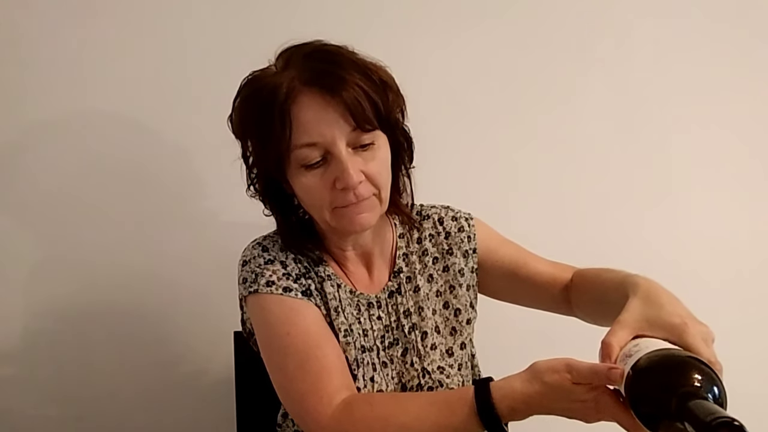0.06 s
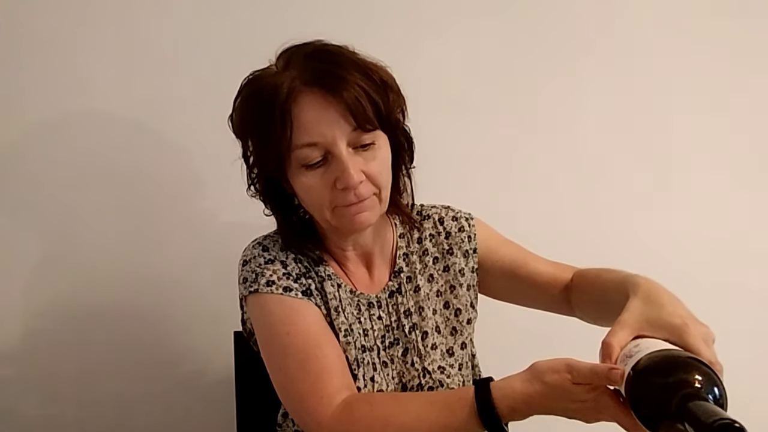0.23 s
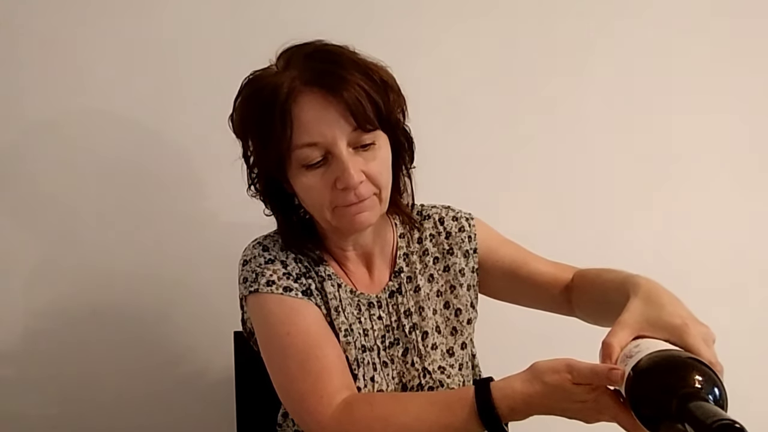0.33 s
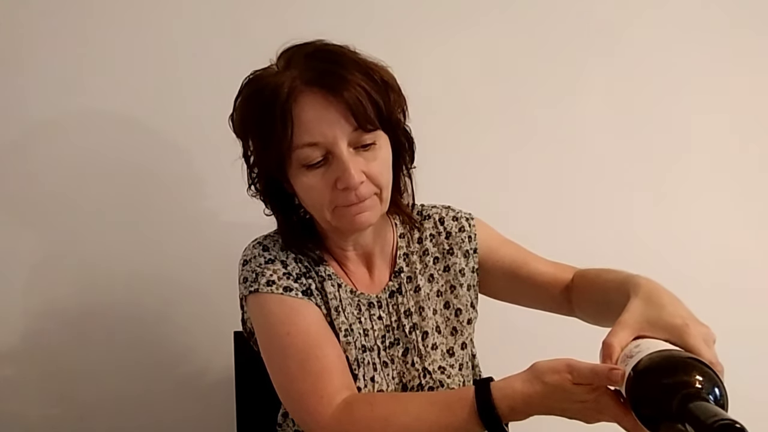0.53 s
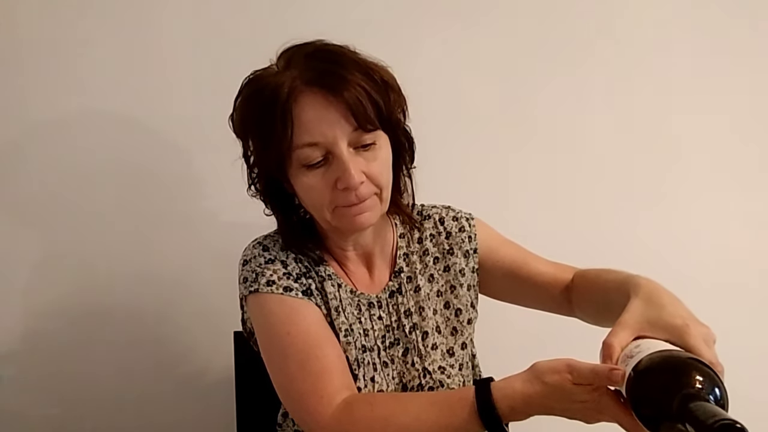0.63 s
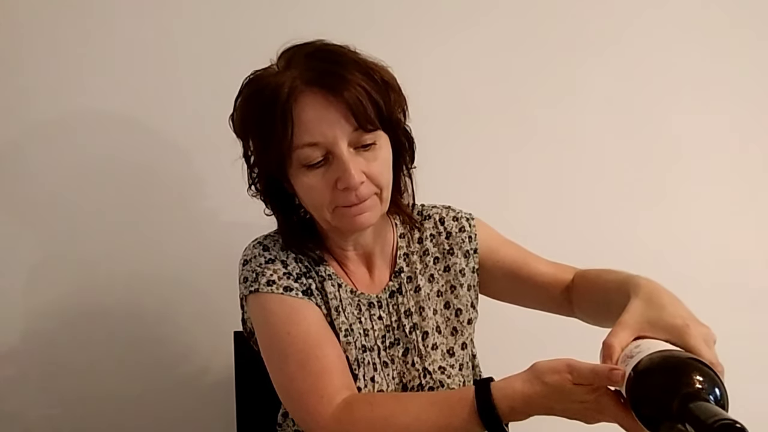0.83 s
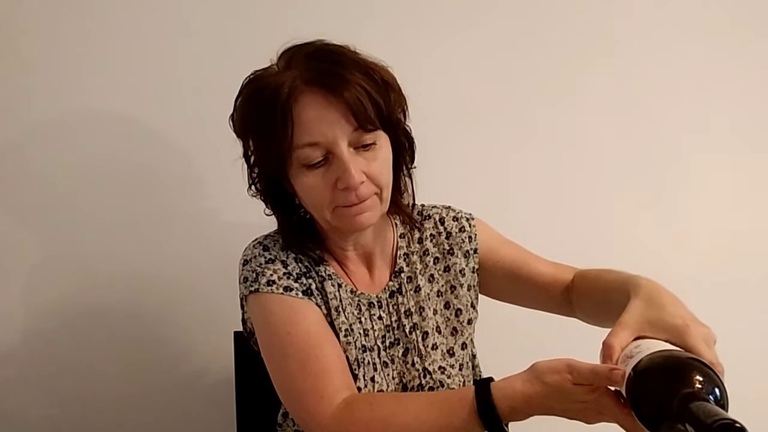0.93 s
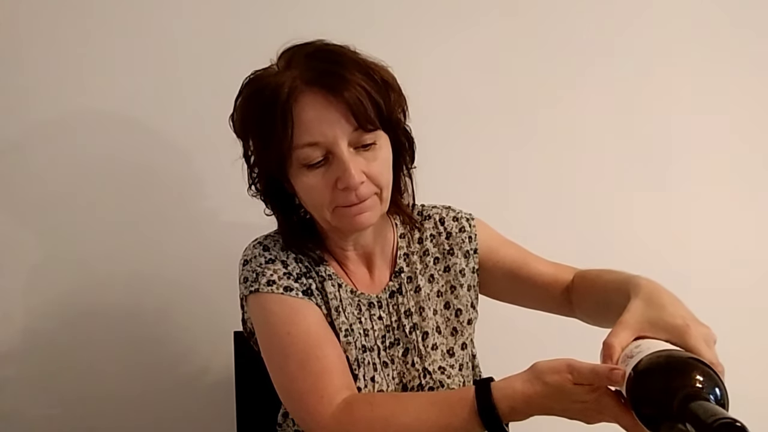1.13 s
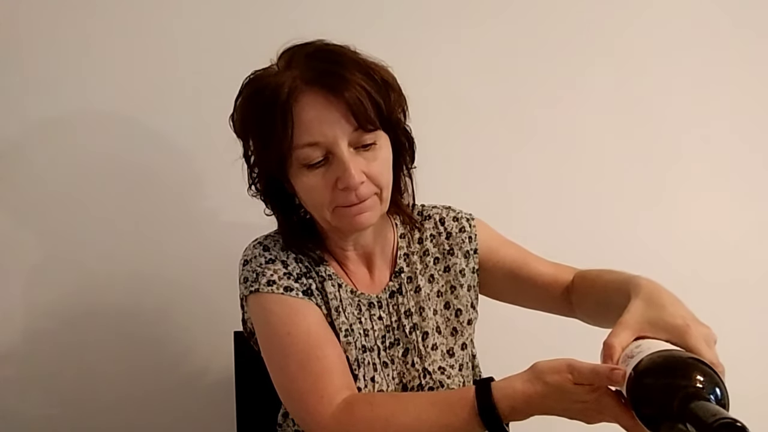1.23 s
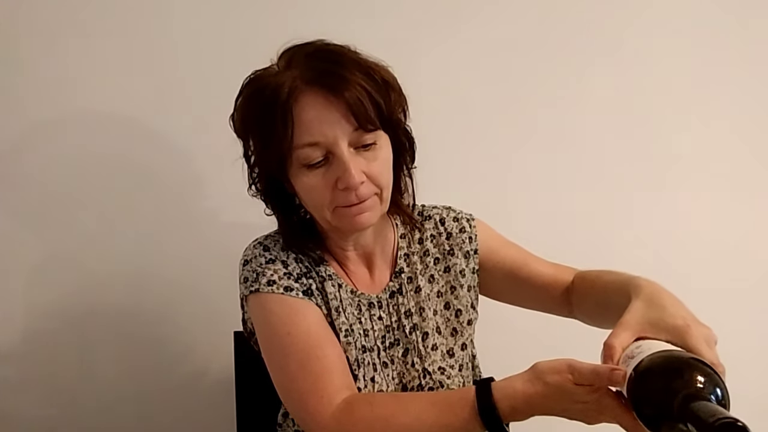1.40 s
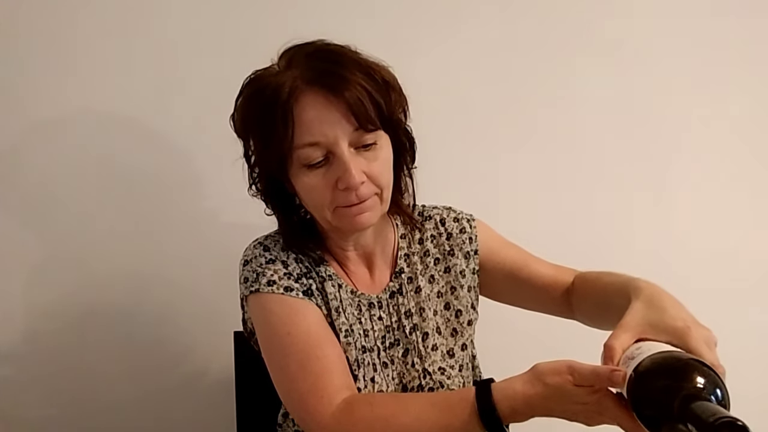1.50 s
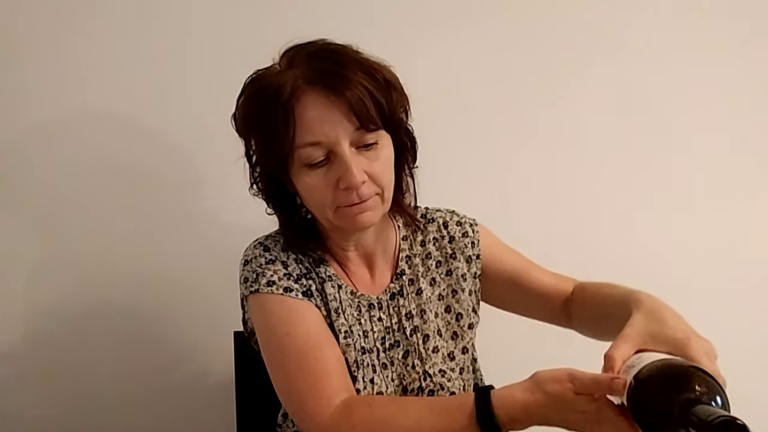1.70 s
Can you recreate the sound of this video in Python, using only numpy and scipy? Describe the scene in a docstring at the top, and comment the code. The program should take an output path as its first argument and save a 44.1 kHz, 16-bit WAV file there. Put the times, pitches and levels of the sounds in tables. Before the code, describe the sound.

Irregular bubbly glugs of water pouring from bottle to jug, with fine spray fizz and low air gulps; scattered at first, then a strong run, a lull and another burst, heard with short echoes off near walls.

```python
"""Water glugs from a tilted glass bottle into a jug in a small bare room.
It opens on faint narrow rings, a breath of spray fizz and a low gulp of air; then the first slugs froth and pop.
Scattered glugs lead to the loudest run, from about 0.8 s to 1.1 s, with low gulps in the bottle beneath.
After a lull a steady tone grows at 1.29 s into a second strong burst near 1.42 s, then thin glugs to the end.
Bubbles are short rings of rising pitch, coloured by jug resonances; echoes off near walls repeat them."""
import sys
import numpy as np
from scipy import signal
from scipy.fft import rfft, irfft
from scipy.io import wavfile

SR = 44100
rng = np.random.default_rng(int(sys.argv[2]) if len(sys.argv) > 2 else 0)


def generate_wav(sig):
    """Save sig (samples, or channels by samples) to the path in sys.argv[1] as 16-bit PCM at SR."""
    pcm = np.round(np.clip(np.atleast_2d(sig).T, -1, 1) * 32767).astype(np.int16)
    wavfile.write(sys.argv[1], SR, pcm)


def invert_db(level):
    """Linear amplitude ratio for a level in decibels (20 dB per decade), elementwise."""
    return 10 ** (np.asarray(level, dtype=float) / 20)


N = 77175  # samples, 1.75 s


def bubbles(time_s, level_db, pitch_hz, t60_s, climb, swell_s):
    """A trapped bubble swells, then dies away while its pitch climbs by twice the share `climb` over t60."""
    t60_s = np.maximum(t60_s, 0.002)
    t = np.arange(int(min(t60_s.max(), 0.07) * SR)) / SR
    pitch_hz, t60_s = np.asarray(pitch_hz)[:, None], t60_s[:, None]
    progress = np.minimum(t / t60_s, 1)
    phase = 2 * np.pi * pitch_hz * t * (1 - climb / 2 + climb * progress)
    shape = (1 - np.exp(-(t / swell_s) ** 2)) * invert_db(-60 * t / t60_s)
    shape = shape / shape.max(axis=1, keepdims=True)
    rings = invert_db(level_db)[:, None] * shape * np.sin(phase)
    # each ring starts one swell early, so that it is full near its stated time
    start = np.maximum((time_s - swell_s) * SR, 0).astype(int)
    at = start[:, None] + np.arange(len(t))
    return np.bincount(at.ravel(), rings.ravel(), N + SR)[:N]


# large bubbles, peak level ahead of jug and room: time_s, level_db, pitch_hz, t60_s
LARGE_BUBBLES = [(0.21, -41.5, 770, 0.026), (0.265, -40, 940, 0.018), (0.29, -43.5, 858, 0.072),
                 (0.46, -47, 924, 0.026), (0.481, -45, 990, 0.031), (0.509, -44.5, 910, 0.062),
                 (0.153, -63, 796, 0.021), (0.397, -64.5, 522, 0.018), (0.590, -43, 1073, 0.03),
                 (0.606, -46, 948, 0.04), (0.657, -43.5, 788, 0.012), (0.733, -39.5, 770, 0.026),
                 (0.78, -44.5, 989, 0.02), (0.809, -31.5, 892.5, 0.065), (0.843, -43.5, 924, 0.088),
                 (0.954, -48, 866, 0.041), (1.0, -31, 858, 0.037), (1.033, -33, 974, 0.0305),
                 (1.047, -40, 963, 0.044), (1.106, -44, 979, 0.029), (1.357, -40.5, 839, 0.022),
                 (1.415, -33, 794, 0.052), (1.445, -36.5, 816, 0.032), (1.603, -57, 1020, 0.068),
                 (1.668, -44.5, 780, 0.0064)]


def glugs():
    """Large bubbles swell slowly, ring low and climb the most in pitch."""
    time_s, level_db, pitch_hz, t60_s = np.transpose(LARGE_BUBBLES)
    return bubbles(time_s, level_db, pitch_hz, t60_s, climb=0.22, swell_s=0.003)


# small bubbles, peak level ahead of jug and room: time_s, level_db, pitch_hz
SMALL_BUBBLES = [(0.1517, -59.5, 4150), (0.2672, -43.5, 2930), (0.3121, -55, 2340), (0.335, -44, 2570),
                 (0.5071, -46, 2156), (0.7795, -50.5, 2094), (0.9621, -45, 2763), (0.974, -42.5, 3840),
                 (0.997, -39, 2184), (1.4168, -33.5, 2228), (1.4162, -41.5, 2920), (1.468, -47.5, 2866),
                 (1.4949, -47, 2520)]


def plinks():
    """Small bubbles ring higher, each for the same count of cycles."""
    time_s, level_db, pitch_hz = np.transpose(SMALL_BUBBLES)
    return bubbles(time_s, level_db, pitch_hz, 48 / pitch_hz, climb=0.1, swell_s=0.001167)


# droplets of spray, peak level ahead of jug and room: time_s, level_db, pitch_hz
SPRAY_DROPLETS = [(0.4682, -47, 6460), (0.5187, -44.5, 6630), (0.5275, -44.5, 7740), (0.6153, -50, 5520),
                  (0.8534, -47.5, 8300), (0.89, -49, 7500), (0.958, -42, 5650), (0.9955, -40.5, 6060),
                  (1.066, -48, 5820), (1.0983, -48.5, 6300), (1.2828, -49, 7350), (1.511, -49, 7000),
                  (1.5657, -45, 5780), (1.6823, -44, 5720)]


def droplets():
    """Droplets of spray tick as very short, high rings with little climb."""
    time_s, level_db, pitch_hz = np.transpose(SPRAY_DROPLETS)
    return bubbles(time_s, level_db, pitch_hz, 55 / pitch_hz, climb=0.04, swell_s=0.0006)


# water slaps the surface, click level ahead of jug and room: time_s, level_db
SURFACE_SLAPS = [(0.2668, -32), (.336, -39), (0.5785, -33.5), (1.4165, -32.5), (1.682, -47)]


def slaps():
    """Water slaps the surface: clicks dulled by a band-pass."""
    low_hz, high_hz = 350, 1670
    time_s, level_db = np.transpose(SURFACE_SLAPS)
    clicks = np.bincount((time_s * SR).astype(int), invert_db(level_db), N) + 1e-18
    band = signal.butter(3, [low_hz, high_hz], "band", fs=SR, output="sos")
    return signal.sosfilt(band, clicks) * SR / high_hz / 2  # makes up for the narrow band


def rms_one(x):
    """Scales a signal to rms 1."""
    return x / np.sqrt(np.mean(x ** 2) + 1e-20)


def swarm(count, low_hz, high_hz, cycles, climb):
    """Many bubbles at random moments, levels and pitches; rms 1."""
    when, chance, place = rng.random((count, 3)).T
    pitch_hz = low_hz * (high_hz / low_hz) ** place
    level_db = -3.5 * np.log(chance * 0.98 + 0.02)  # a few stand well above the rest
    swell_s = 3.564 / pitch_hz.mean()
    return rms_one(bubbles(when * N / SR, level_db, pitch_hz, cycles / pitch_hz, climb, swell_s))


def bursts(start_s, length_s, level_db, rise_s, fade_s):
    """One envelope a row: rise, sagging hold, then decay with 1/e time fade_s."""
    sag = 0.79  # share of strength lost within a burst
    t = np.arange(N) / SR - start_s[:, None]
    length_s = length_s[:, None]
    hold = np.clip(t / rise_s, 0, 1) * (1 - sag * np.clip(t / length_s, 0, 1))
    return invert_db(level_db)[:, None] * hold * np.exp(-np.maximum(t - length_s, 0) / fade_s)


# slugs of water landing in the jug, with the froth of four bubble sizes ahead of jug and room:
# start_s, length_s, big_db, middling_db, small_db, tiny_db
WATER_SLUGS = [(0.148, 0.027, -74.5, -74, -80, -75.5), (0.211, 0.098, -62, -55, -64.5, -58.5),
               (0.264, 0.09, -66.5, -49.5, -56, -76), (0.467, 0.099, -57, -52.5, -58, -67),
               (0.576, 0.04, -55, -49.5, -60.5, -69.5), (0.752, 0.11, -61.5, -60, -65.5, -63.5),
               (0.806, 0.014, -52, -44, -65, -87), (0.89, 0.023, -92, -59, -58, -107),
               (0.923, 0.14, -65, -62.5, -59, -60.5), (1.0, 0.059, -66.5, -45, -55.5, -84),
               (1.335, 0.14, -64.5, -56.5, -61, -73), (1.418, 0.023, -44, -41, -66, -50.5),
               (1.463, 0.083, -105, -60, -54.5, -61.5), (1.59, 0.09, -65, -64.5, -67, -71),
               (1.678, 0.079, -72, -56.5, -64, -63.5)]
# froth sizes, big to tiny: low_hz, high_hz, ring_cycles (to -60 dB)
FROTH_SIZES = [(370, 650, 14), (700, 1150, 16), (1350, 3100, 20), (3300, 6800, 30)]


def churn():
    """Each slug froths with bubbles of four sizes; the smaller, the more."""
    start_s, length_s, *levels = np.transpose(WATER_SLUGS)
    out = 0
    for k, (level_db, (low_hz, high_hz, cycles)) in enumerate(zip(levels, FROTH_SIZES)):
        froth = swarm(250 + 500 * k * k, low_hz, high_hz, cycles, climb=0.2)
        out = out + froth * bursts(start_s, length_s, level_db, rise_s=0.0019, fade_s=0.016).sum(0)
    return out


# the jug's air column singing on, full level ahead of the room: start_s, length_s, level_db, pitch_hz
SINGING_TONES = [(1.292, 0.088, -49.5, 935)]


def singing():
    """The jug's air column sings on: a steady tone that grows, then dies away."""
    start_s, length_s, level_db, pitch_hz = np.transpose(SINGING_TONES)[..., None]
    t = np.arange(N) / SR - start_s
    onset = np.clip(t / 0.0023, 0, 1)
    growth = np.clip(0.24 + t / length_s, 0, 1)
    fade = np.exp(-np.maximum(t - length_s, 0) / 0.026)
    return (invert_db(level_db) * onset * growth * fade * np.sin(2 * np.pi * pitch_hz * t)).sum(0)


def resonance(x, hz, width_hz):
    """Two-pole peak of gain 1."""
    r = np.exp(-np.pi * width_hz / SR)
    zeros = np.array([1, 0, -1]) * (1 - r * r) / 2
    poles = [1, -2 * r * np.cos(2 * np.pi * hz / SR), r * r]
    return signal.lfilter(zeros, poles, x)


# faint clusters of like-sized bubbles, starting level ahead of the room:
# start_s, level_db, pitch_hz, width_hz (of each of two filters), t60_s
BUBBLE_CLUSTERS = [(0.036, -68.5, 1218, 61, 0.64), (0.034, -66, 2260, 298, 0.19),
                   (0.18, -73.5, 1624, 59.7, 0.15), (1.159, -69.5, 2850, 344, 0.26),
                   (1.607, -64, 4120, 350, 0.18)]


def lingering():
    """Like-sized bubbles make a broken ring at one pitch: narrow noise that starts at once and dies away."""
    t, white = np.arange(N) / SR, rng.standard_normal(N)
    out = 0
    for start_s, level_db, pitch_hz, width_hz, t60_s in BUBBLE_CLUSTERS:
        narrow = resonance(resonance(white, pitch_hz, width_hz), pitch_hz, width_hz)
        decay = invert_db(level_db - 60 * np.maximum(t - start_s, 0) / t60_s) * (t > start_s)
        out = out + decay * rms_one(narrow)
    return out


# bursts of spray, level at the centre ahead of the room: start_s, length_s, level_db, centre_hz
SPRAY_BURSTS = [(0.084, 0.2, -75.5, 7500), (0.283, 0.077, -62, 6530), (0.46, 0.21, -62, 6290),
                (0.844, 0.12, -64, 7600), (0.949, 0.091, -61.5, 5740), (1.062, 0.14, -69.5, 6970),
                (1.285, 0.12, -65.5, 6870), (1.405, 0.29, -66.5, 6500), (1.672, 0.038, -56.5, 6620)]


def spray():
    """Fine fizz of tiny bubbles in six bands, loudest near each burst's centre pitch."""
    start_s, length_s, level_db, centre_hz = np.transpose(SPRAY_BURSTS)
    out = 0
    for hz in np.geomspace(4800, 13000, 6):
        fizz = swarm(850, hz / 1.11, hz * 1.11, cycles=26, climb=0.04)
        octaves = np.log2(hz / centre_hz)
        tilt_db = np.where(octaves > 0, -20 * octaves, 50 * octaves)
        out = out + fizz * bursts(start_s, length_s, level_db + tilt_db, rise_s=0.0051, fade_s=0.036).sum(0)
    return out


# gulps of air into the bottle, level ahead of the room: start_s, length_s, level_db, pitch_hz (at centre)
AIR_GULPS = [(.125, 0.022, -63, 160.7), (.42, 0.022, -65, 118), (.615, 0.013, -56, 180),
             (.66, 0.044, -63.5, 123), (.882, 0.081, -58, 168.4), (.92, 0.092, -57, 129.8),
             (1.1, 0.019, -62, 95), (1.33, 0.13, -60, 131.8), (1.614, 0.14, -80, 114.4)]


def gulps():
    """Each gulp shakes the bottle's air space: a low, wavering tone that sinks."""
    rough = 0.5  # depth of the wavering
    start_s, length_s, level_db, pitch_hz = np.transpose(AIR_GULPS)
    t = np.arange(N) / SR - start_s[:, None]
    slow = signal.butter(2, 25, fs=SR, output="sos")
    waver = rough * rms_one(signal.sosfilt(slow, rng.standard_normal((2, N))))
    sink = 1 - 0.28 * np.clip(t - length_s[:, None], -0.2, 0.2)
    phase = 2 * np.pi * pitch_hz[:, None] * t * sink
    tone = (1 + waver[0]) * np.sin(phase) + waver[1] * np.cos(phase)
    return (bursts(start_s, length_s, level_db, rise_s=0.0063, fade_s=0.016) * tone).sum(0)


# air column and walls of the jug: pitch_hz, width_hz, gain_db (at the peak)
JUG_RESONANCES = [(493, 61.5, 1.5), (868, 42, 0.5), (957.8, 52, 6), (1103, 28.8, 7.5), (1213, 47, 3),
                  (2164, 65, -2), (2520, 220, 1), (2850, 54.4, 11), (3620, 58, -5.5)]


def jug(x):
    """The jug's air column and walls add their resonances to the direct sound."""
    ringing = sum(invert_db(gain_db) * resonance(x, hz, width_hz) for hz, width_hz, gain_db in JUG_RESONANCES)
    return invert_db(-3.5) * x + ringing


# near walls: delay_s, gain_db
WALL_ECHOES = [(.0096, -9), (0.0195, -14.5)]


def room(x):
    """Two sharp echoes, then ten dulling feedback delays smeared by three allpasses."""
    t60_s, late_db, wall_cut_hz = 0.2, -12.5, 2400  # t60 holds in the bass, before the walls dull the sound
    smear = 0.36
    hz = np.arange(N + 1) * SR / (2 * N)

    def delay(lag_s):
        return np.exp(-2j * np.pi * hz * lag_s)

    early = sum(invert_db(gain_db) * delay(lag_s) for lag_s, gain_db in WALL_ECHOES)
    late = 0
    for k, lag_s in enumerate(np.geomspace(0.0231, 0.0577, 10)):
        loop = invert_db(-60 * lag_s / t60_s) / (1 + 1j * hz / wall_cut_hz) * delay(lag_s)
        late = late + invert_db(late_db) * (-1) ** k * loop / (1 - loop)
    for lag_s in (0.0011, 0.0023, 0.0041):
        z = delay(lag_s)
        late = late * (smear + z) / (1 + smear * z)
    return irfft(rfft(x, 2 * N) * (1 + early + late))[:N]


def coloured(spectrum):
    """Noise of the given spectrum, rms 1."""
    hz, db = np.transpose(spectrum)
    bins = np.arange(1, N // 2 + 2) * SR / N
    gain = invert_db(np.interp(np.log(bins), np.log(hz), db))
    return rms_one(irfft(rfft(rng.standard_normal(N)) * gain, N))


# spectrum of the still air: frequency_hz, density_db (relative, per Hz)
AIR_SPECTRUM = [(40, -5), (637, -17.5), (949, -10), (1250, -20), (2840, -13), (4030, -24), (9890, -11.5),
                (15500, -24)]


def still_air():
    """Steady coloured noise of the still air."""
    return invert_db(-76.5) * coloured(AIR_SPECTRUM)


# spectrum of the hiss: frequency_hz, density_db (relative, per Hz)
HISS_SPECTRUM = [(40, -6), (797, -10), (1020, -13.5), (15500, -3.5)]


def hiss():
    """Faint coloured noise, of opposite sign in the two channels."""
    return invert_db(-80.5) * coloured(HISS_SPECTRUM) * [[1], [-1]]


def scene():
    """Water through jug and room, over still air, alike in both channels."""
    in_jug = jug(glugs() + plinks() + droplets() + slaps() + churn())
    water = room(in_jug + singing() + lingering() + spray() + gulps())
    mix = water + still_air()
    return np.array([mix, mix])


def top_cut(x):
    """Nothing passes above the cut-off."""
    return signal.sosfilt(signal.butter(12, 15720, fs=SR, output="sos"), x)


def record(dry):
    """Adds the hiss to the scene and finishes the mix."""
    mix = dry + hiss()
    return top_cut(mix)


dry = scene()
out = record(dry)
generate_wav(out)
```